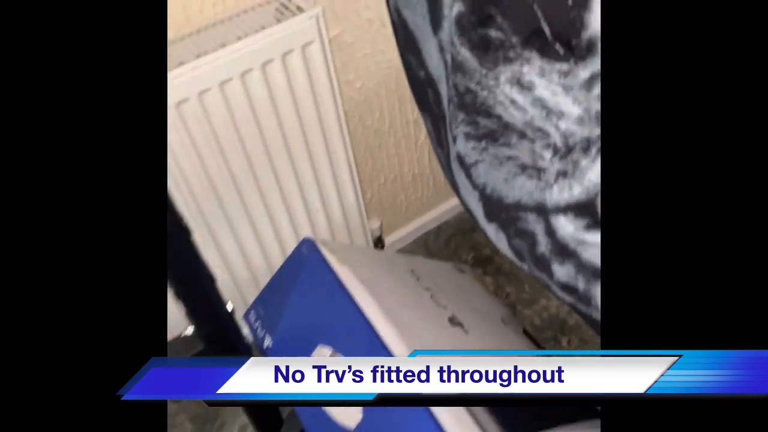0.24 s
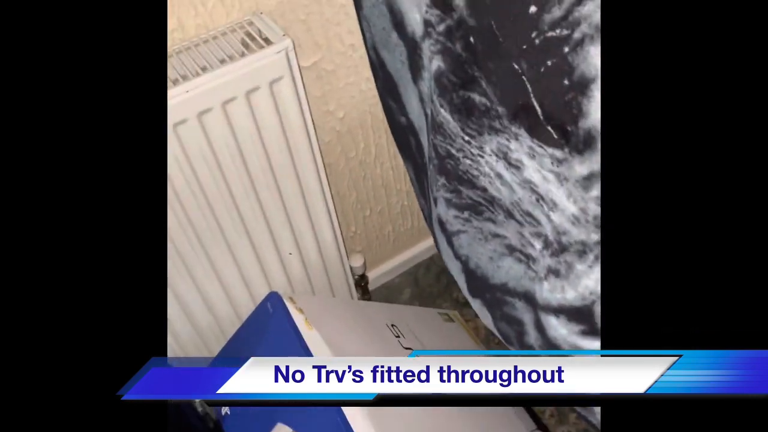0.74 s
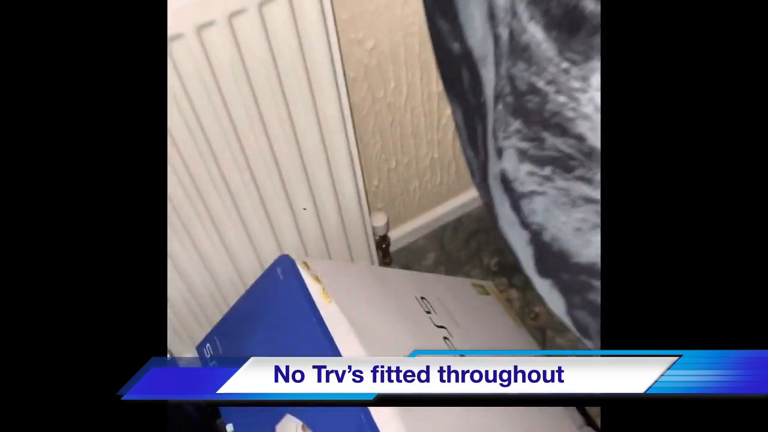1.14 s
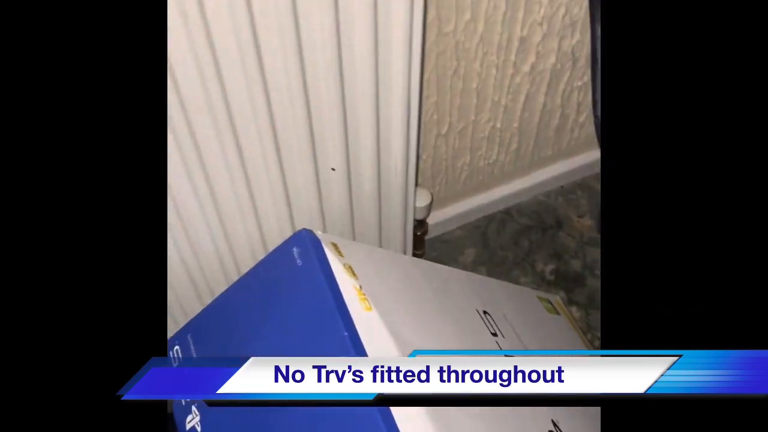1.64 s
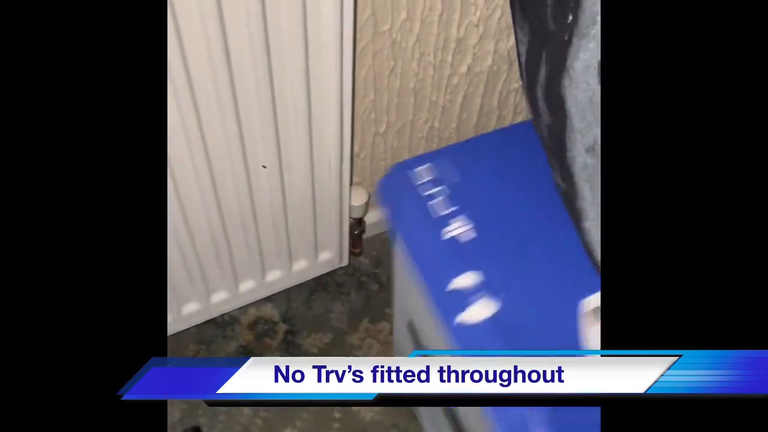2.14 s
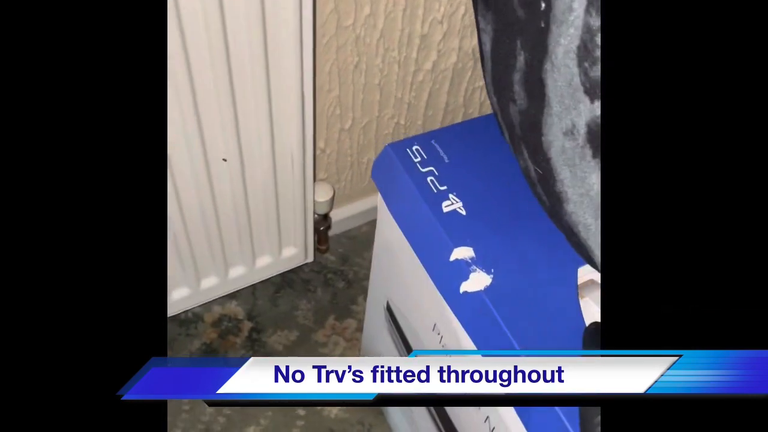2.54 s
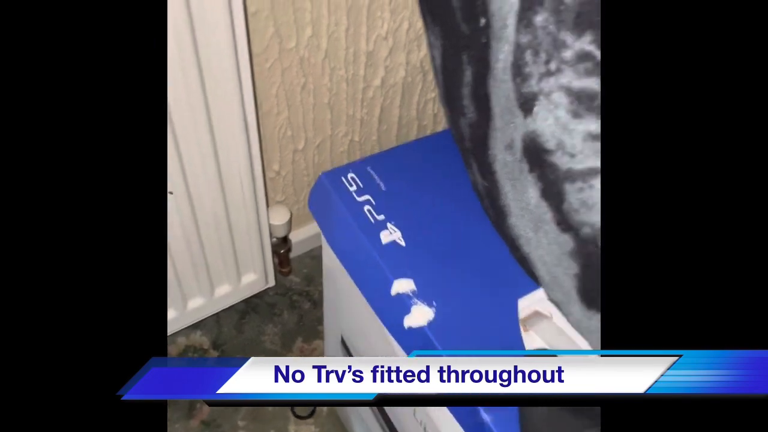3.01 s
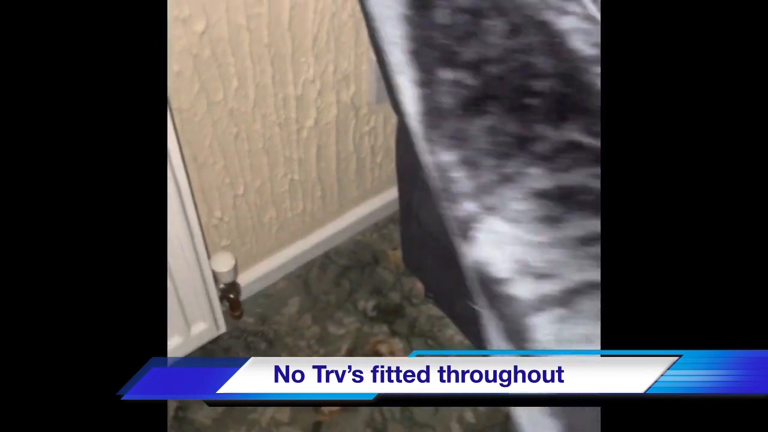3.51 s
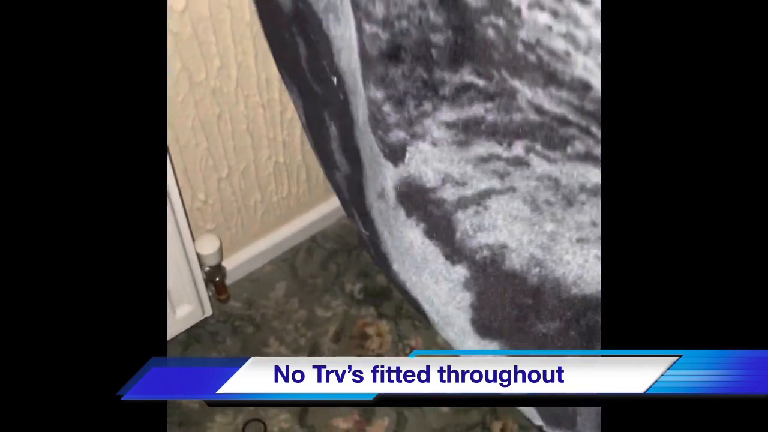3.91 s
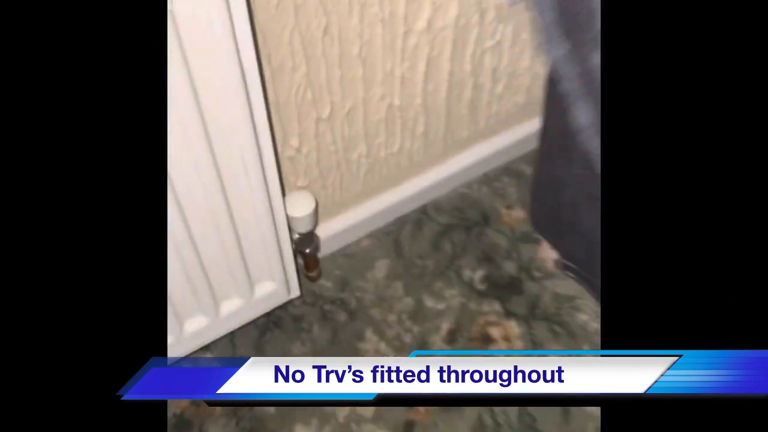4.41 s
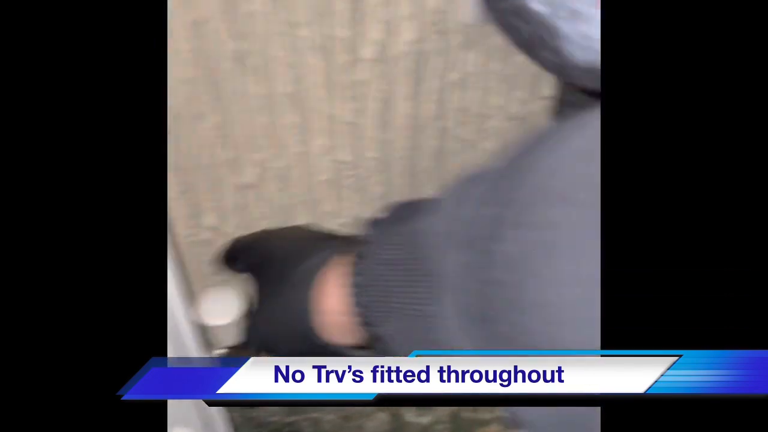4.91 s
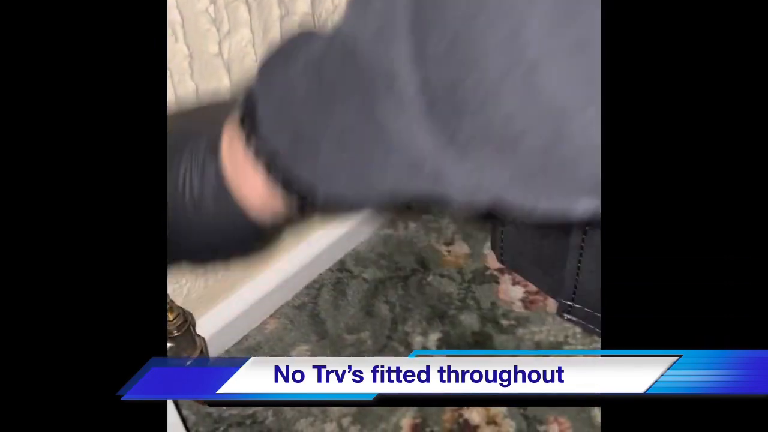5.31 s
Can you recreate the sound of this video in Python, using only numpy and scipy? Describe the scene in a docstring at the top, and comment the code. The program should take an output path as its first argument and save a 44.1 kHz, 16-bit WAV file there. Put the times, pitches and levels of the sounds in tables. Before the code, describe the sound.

In a small furnished room, someone moves a cardboard box across a carpeted floor. Feet, knees and the hollow box thud unevenly on the boards, while flaps tick, soles scuff and clothes rustle. After a quieter moment, a stiff joint creaks briefly and a hard knock makes a metal radiator panel ring and rattle. A phone picks it up close by, over a faint low house rumble.

```python
"""Knees, feet and a cardboard box thud on carpeted floorboards as someone kneels and shifts the box.
Flaps tick, soles scuff, and clothes and card rustle over the carpet. At the end a stiff joint creaks
as it sticks and slips, and a hard knock sets the metal panel of a radiator ringing. The house rumbles
faintly throughout. The small furnished room is heard by a phone with two microphone openings."""
import sys
import numpy as np
from scipy import signal
from scipy.fft import rfft, irfft, next_fast_len
from scipy.io import wavfile
from scipy.ndimage import uniform_filter1d

SR = 44100
rng = np.random.default_rng(int(sys.argv[2]) if len(sys.argv) > 2 else 0)


def materialize(psi):
    """Save the field psi as 16-bit PCM at rate SR to the path in sys.argv[1].

    A 1-D psi becomes a single channel; in a 2-D psi each row is a channel.
    """
    bounded = np.clip(np.atleast_2d(psi).T, -1, 1)
    quanta = np.round(bounded * 32767).astype(np.int16)
    wavfile.write(sys.argv[1], SR, quanta)


N = 244734
RING_SAMPLES = int(0.65 * SR)


def undb(db):
    """Turn decibels into a number to multiply by."""
    return 10 ** (np.asarray(db) / 20)


def along(table, n):
    """Read a table of (pitch_hz, value) at every frequency of an n-sample spectrum."""
    hz, value = np.transpose(table)
    return np.interp(np.log(np.arange(n // 2 + 1) * SR / n + 1), np.log(hz), value)


def noise(colour, grain_db=0.):
    """Noise of average strength 1, shaped by (pitch_hz, level_db) rows; grain_db makes it crackle."""
    ends = [(colour[0][0] / 2, -80)] + list(colour) + [(colour[-1][0] * 2, -80)]
    n = next_fast_len(N)
    grains = rng.standard_normal(n) * undb(grain_db * np.minimum(rng.exponential(size=n), 7))
    x = irfft(rfft(grains) * undb(along(ends, n)), n)[:N]
    return x / x.std()


def wander(rate_hz):
    """A curve that glides to a new random value rate_hz times a second."""
    step = int(SR / rate_hz) + 1
    return uniform_filter1d(np.repeat(rng.standard_normal(N // step + 1), step), step)[:N]


def fade(fade_s, count=RING_SAMPLES):
    """A level that falls by 60 dB every fade_s seconds."""
    return np.exp(-np.log(1000) * np.arange(count) / SR / fade_s)


def swell(rise_s, count=RING_SAMPLES):
    """A level that builds smoothly from 0 to 1, like the force of a contact."""
    return 1 - np.exp(-(np.arange(count) / SR / rise_s) ** 2)


def ring(hz, fade_s, phase=0., count=RING_SAMPLES):
    """One pure tone dying away."""
    return np.sin(2 * np.pi * hz * np.arange(count) / SR + phase) * fade(fade_s, count)


def band(x, hz, width_hz):
    """A resonance: keep the part of a sound that lies near hz."""
    width_hz = np.clip(width_hz, 10, min(3 * hz, SR / 3))
    return signal.lfilter(*signal.iirpeak(hz, hz / width_hz, SR), x)


def add(track, start_s, sound):
    """Mix a sound into the track at start_s."""
    i = int(start_s * SR)
    track[i:i + len(sound)] += sound[:N - i]


def house_rumble():
    """The house gives off a faint, steady, deep noise."""
    return undb(-59) * noise([(36, -24), (44, 11.5), (52, -10), (62, 9.5), (80, 2)])


def room_echo(sound):
    """The furnished room returns two short, dull echoes, each a different blur of the sound."""
    t = np.arange(int(0.5 * SR)) / SR
    tails = rng.standard_normal((2, len(t))) * fade(0.19, len(t)) * np.minimum(t / 0.00069, 1)
    tails = signal.lfilter(*signal.butter(1, [215, 3300], "band", fs=SR), tails)
    tails /= np.sqrt((tails[0] ** 2).sum())
    return undb(-15.5) * signal.fftconvolve(sound[None], tails, axes=1)[:, :N]


def patchy(x, depth_db=1.3, width_hz=1244):
    """Each range of pitch swells and sinks on its own, about 40 ms at a time."""
    hz, _, spectrum = signal.stft(x, SR, nperseg=512)
    patches = rng.standard_normal(spectrum.shape[1:])
    for _ in range(2):
        patches = uniform_filter1d(patches, int(width_hz / hz[1]), axis=0)  # smooth across pitch
        patches = uniform_filter1d(patches, 7, axis=1)  # smooth across time
    return signal.istft(spectrum * undb(depth_db * patches / patches.std()), SR, nperseg=512)[1][:, :N]


def movement():
    """With each move, cloth rustles, card drags and weight makes the boards rumble; two noise tracks."""
    # moves over the carpet: start_s, hold_s, cloth_db, card_db, boards_db
    moves = [(0, 0.13, -62, -56, -59.5), (0.231, 0.32, -61.5, -69, -58.5), (0.82, 0.14, -61.5, -56.5, -53),
             (1.253, 0.12, -58.5, -53, -43.5), (1.673, 0.0074, -56, -60, -41),
             (1.693, 0.0057, -62, -46.5, -33.5), (2.06, 0.018, -57.5, -74, -49),
             (2.162, 0.054, -51, -48, -38.5), (2.389, 0.056, -53, -61, -48),
             (2.51, 0.03, -63, -49.5, -44.5), (2.725, 0.033, -60, -55, -42),
             (2.907, 0.037, -54.5, -43.5, -46), (2.972, 0.067, -61, -69, -41),
             (3.291, 0.011, -54, -52.5, -46.5), (3.534, 0.14, -50.5, -51.5, -41),
             (3.692, 0.16, -69, -52, -43.5), (3.849, 0.14, -63, -57.5, -48.5),
             (4.099, 0.042, -52, -60, -59), (4.211, 0.14, -56.5, -54, -50.5),
             (4.37, 0.6, -58.5, -65, -56.5), (5.134, 0.11, -65, -49.5, -55),
             (5.25, 0.015, -73, -44.5, -32.5), (5.347, 0.09, -88, -48, -40)]
    # tone colour of rustling cloth: pitch_hz, level_db
    cloth = [(700, 0.5), (1000, 4), (1850, 1), (2600, 2), (4100, -1), (6000, -1.5), (8000, -7), (11000, -7),
             (13000, -13), (16000, -11.5)]
    # tone colour of dragged card: pitch_hz, level_db
    card = [(200, 9.5), (300, 8), (500, 5.5), (900, -2), (1500, -9.5), (2500, -13)]
    # tone colour of boards under weight: pitch_hz, level_db
    boards = [(30, -25), (40, 5.5), (51, 7), (65, 3.5), (108, 4), (160, -2.5), (220, -4.5), (300, -17),
              (420, -19)]
    # colour, rest_db, rise_db_per_s, fall_db_per_s, flicker_db, flicker_hz, grain_db
    layers = [(cloth, -68, 298, 153, 1.8, 70, 2.8),
              (card, -63.5, 249, 145, 3.5, 50, 2.2),
              (boards, -62.5, 230, 101, 3.5, 15, 0)]
    t = np.arange(N) / SR
    start_s, hold_s, *levels_db = np.transpose(moves)[:, :, None]
    before_s, after_s = np.maximum(start_s - t, 0), np.maximum(t - start_s - hold_s, 0)
    out = 0
    for (colour, rest_db, rise, fall, flicker_db, flicker_hz, grain_db), db in zip(layers, levels_db):
        move_gains = undb(db - rise * before_s - fall * after_s)
        power = undb(rest_db) ** 2 + (move_gains ** 2).sum(axis=0)
        gain = np.sqrt(power) * undb(flicker_db * wander(flicker_hz))
        pair = np.array([noise(colour, grain_db), noise(colour, grain_db)])
        out = out + gain * (patchy(pair) if colour is cloth else pair)
    return out


def scuffs():
    """A sole or card rubs the carpet: a short hiss swells and fades."""
    # rubs on the carpet: start_s, peak_db, pitch_hz, width_hz, fade_s
    rubs = [(0.284, -46.5, 1930, 500, 0.067), (.865, -44, 1930, 600, 0.18),
            (1.722, -40.5, 2170, 2920, 0.16), (2.016, -39, 1880, 2500, 0.1),
            (2.882, -36, 1620, 1460, 0.036), (3.532, -36.5, 3000, 4000, 0.09)]
    out = np.zeros(N)
    for start_s, peak_db, hz, width_hz, fade_s in rubs:
        friction = rng.standard_normal(RING_SAMPLES) * fade(fade_s) * swell(rise_s=0.016)
        rub = band(band(friction, hz, width_hz), hz, 2 * width_hz)
        add(out, start_s, undb(peak_db) * rub / abs(rub).max())
    return out


def creak(throb_hz=45, throb_db=1):
    """A stiff joint sticks and slips hundreds of times a second, and each slip shakes the wood."""
    # course of the creak: time_s, slip_rate_hz, level_db
    course = [(5.1, 500, -57), (5.12, 518.2, -41.5), (5.155, 546.3, -32.5), (5.192, 571.3, -30.5),
              (5.199, 577, -25.5), (5.227, 438.3, -27.5), (5.25, 426.5, -24.5), (5.272, 430, -30)]
    # resonances of the wood: pitch_hz, width_hz, level_db
    wood = [(429, 37, 1.5), (554, 74, 0.5), (836, 98, -12), (1114, 114, -15), (1400, 100, -19.5),
            (1620, 120, -26), (2370, 130, -38)]
    t = np.arange(N) / SR
    time_s, slip_hz, level_db = np.transpose(course)
    slip_count = np.cumsum(np.interp(t, time_s, slip_hz) * (1 + 0.02036 * wander(120))) / SR
    slips = np.diff(np.floor(slip_count), prepend=0) * undb(1.9 * wander(90))
    slips += 0.092 * rng.standard_normal(N)
    body = sum((-1) ** k * undb(db) * band(slips, hz, width) for k, (hz, width, db) in enumerate(wood))
    grip_db = throb_db * np.cos(2 * np.pi * throb_hz * (t - time_s[4]))  # grips and lets go
    return body / body.std() * undb(np.interp(t, time_s, level_db, left=-120, right=-120) + grip_db)


def radiator(detune=0.0252):
    """Knocks ring the metal panel's tones nearest their own pitch; hard knocks make the tones rattle."""
    # tones of the panel: pitch_hz, level_db, fade_s
    panel = [(405.5, -7, 0.36), (722.5, -32, 0.53), (1087, -23, 0.53), (1040, -23.5, 0.76),
             (1208, -11, 0.029), (1374, -10, 0.062), (1604, -10.5, 0.038), (1500, -20, 0.33),
             (2690, -26, 0.52), (5760, 3.5, 0.054)]
    # blows that reach the panel: start_s, level_db, pitch_hz, spread_octaves, rattle (0 to 1)
    knocks = [(4.242, -13.5, 726, .12, 0), (5.2631, -6.5, 1360, 1.125, 0.76), (5.283, -12, 890, 0.92, 0.84)]
    out = np.zeros(N)
    for k, (hz, tone_db, fade_s) in enumerate(panel):
        shake = 1.07 * wander(130)
        neighbours = np.array([0, *rng.uniform(-1.02, 1, size=2)])  # each tone is three close ones
        for start_s, knock_db, knock_hz, spread_octaves, rattle in knocks:
            nearness = np.exp(-(np.log2(hz / knock_hz) / spread_octaves) ** 2)
            gain = (-1) ** k * undb(knock_db + tone_db) * nearness / 2
            tone = sum(ring(hz * (1 + detune * n), fade_s, 2 * np.pi * n) for n in rattle * neighbours)
            depth = rattle * swell(rise_s=0.022)
            flutter = 1 - depth + depth * np.roll(shake, -int(start_s * SR))[:RING_SAMPLES]
            add(out, start_s, gain * tone * flutter)
    return out


def crack(time_s=5.264, level_db=-4, pitch_hz=1320, width_s=0.00075):
    """The hard knock first meets the radiator in one very short, sharp pulse."""
    t = np.arange(N) / SR - time_s
    return undb(level_db) * np.exp(-(t / width_s) ** 2) * np.sin(1 - 2 * np.pi * pitch_hz * t)


def ticks(count=14000):
    """Card, shoe and metal touch: each makes a pitched burst of noise with a shorter, broader edge. The long
    row at 5.27 s is not a touch: it is a diffuse noise tail that lingers after the hard knock."""
    # contacts, plus one lingering tail at 5.27 s: start_s, level_db, pitch_hz, fade_s, edge_db
    contacts = [(.016, -26.5, 1900, 0.17, -4.5), (.019, -29.5, 3600, 0.19, -1.5),
                (0.441, -44, 590, 0.53, -28), (0.807, -40, 2480, 0.031, -31),
                (1.641, -27.5, 1330, 0.021, -6), (1.656, -35, 4200, 0.027, -4),
                (1.671, -19.5, 965, 0.06, -13), (1.668, -22.5, 3610, 0.029, 2),
                (1.914, -41, 1190, 0.025, -20), (2.045, -31, 1510, 0.028, 1), (2.137, -37, 1800, 0.066, -2),
                (2.182, -31, 1500, 0.3, -17), (2.243, -27.5, 1150, 0.02, -12),
                (2.308, -35.5, 1190, 0.041, -3.5), (2.408, -33.5, 2570, 0.064, -2),
                (2.434, -35, 4950, 0.028, -5.5), (2.706, -32, 890, 0.057, -12),
                (2.735, -25, 1470, 0.045, -7.5), (2.769, -35.5, 1040, 0.027, -8),
                (2.914, -25.5, 775, 0.11, -33), (2.927, -22.5, 1680, 0.043, -8.5),
                (3.101, -55.5, 6030, 0.017, 15.5), (3.214, -40, 1100, 0.03, -9),
                (3.253, -37.5, 897, 0.024, -27), (3.634, -33, 2900, 0.048, -17),
                (3.671, -37.5, 3040, 0.048, -31), (3.852, -39.5, 2520, 0.043, -12),
                (4.184, -29, 1130, 0.13, 2), (4.236, -31, 2050, 0.011, -26), (4.433, -44.5, 885, 0.024, 2),
                (4.452, -46, 3700, 0.016, -13), (4.55, -49, 2500, .015, 2), (4.93, -45.5, 4970, 0.014, -7),
                (4.982, -48, 5900, .012, -4), (5.27, -26.5, 1405, 0.33, -17),
                (5.263, -23, 10010, 0.0062, 5.5), (5.266, -24, 2550, 0.069, -4),
                (5.293, -17.5, 1240, 0.022, -8.5)]
    out = np.zeros(N)
    for start_s, level_db, hz, fade_s, edge_db in contacts:
        body_noise, edge_noise = rng.standard_normal((2, count))
        rise_s = 0.0015 if edge_db >= 0 else 0.0003
        shape = fade(fade_s, count) * swell(rise_s, count)
        ping = 0.35 * ring(hz, fade_s=0.024, count=count)
        body = band(band((body_noise + ping) * shape, hz, 0.4 * hz), hz, 1.75 * hz)
        edge = band(edge_noise * shape ** 2.2, hz=680, width_hz=2040)
        tick = body / abs(body).max() + undb(edge_db) * edge / abs(edge).max()
        add(out, start_s, undb(level_db) * tick)
    return out


def thuds():
    """The carpet softens each blow, which rings the thing that lands, the hollow box and the boards."""
    # blows of knees, feet and box: start_s, level_db, pitch_hz, fade_s, hollow_db
    blows = [(0.017, -23.5, 375.6, 0.23, 1), (1.21, -40.5, 232, 0.13, -23), (1.277, -33, 70, 0.1, -24),
             (1.642, -28.5, 168, 0.22, -7), (1.669, -14, 208, 0.15, -7), (1.896, -34, 110, 0.066, -11),
             (2.047, -25, 282, 0.054, -13), (2.055, -23.5, 121, 0.14, -32), (2.196, -17.5, 70.5, 0.078, -7),
             (2.226, -20, 133, 0.12, -5), (2.311, -20.5, 398, 0.03, -20), (2.325, -29.5, 134, 0.14, -29),
             (2.423, -33.5, 107, 0.08, -12), (2.709, -29, 134, 0.031, -3.5),
             (2.733, -21, 136.3, 0.25, -1.5), (2.917, -28.5, 304, 0.09, 5), (2.933, -14.5, 146, 0.057, -16),
             (3.009, -30, 318, 0.074, -6), (3.392, -39, 71.6, 0.041, -0.5),
             (3.556, -23.5, 110, 0.044, -5.5), (3.565, -23, 306, 0.092, -38), (3.764, -32, 177, 0.12, -18),
             (3.854, -31, 200, 0.11, -15), (3.931, -30.5, 95, 0.058, -5.5), (4.185, -30, 293, 0.065, 0),
             (4.224, -25.5, 117, 0.066, -15), (4.467, -34, 63.5, 0.11, -37),
             (4.672, -24.5, 67.8, 0.32, -19), (5.111, -34, 89, 0.2, -23), (5.271, -13.5, 86, 0.077, -7),
             (5.301, -27, 49.6, 1, -26), (5.308, -23.5, 107.5, 0.24, -27)]
    # tones of the floorboards: pitch_hz, level_db, fade_s
    board_tones = [(50.5, -0.5, 0.15), (106, -5.5, 0.16), (162.7, -2.5, 0.2), (210.5, -5.5, 0.2)]
    out = np.zeros(N)
    variations = rng.standard_normal((len(blows), len(board_tones)))
    for (start_s, level_db, hz, fade_s, hollow_db), variation in zip(blows, variations):
        body = ring(hz, fade_s) + undb(-14) * ring(1.108 * hz, fade_s)
        body += undb(-13) * ring(1.9 * hz, 0.86 * fade_s)
        boards = sum(undb(db + 8.3 * chance) * ring(board_hz * (1 + 0.045 * chance), board_fade_s)
                     for (board_hz, db, board_fade_s), chance in zip(board_tones, variation))
        boards_db = -12.5 - 1.5 * np.log2(hz / 130)  # higher, lighter things shake the boards less
        burst = rng.standard_normal(RING_SAMPLES) * fade(0.13)
        hollow = band(band(burst, hz=313, width_hz=284), hz=415, width_hz=560)
        blow = body + undb(boards_db) * boards + undb(hollow_db) * hollow / abs(hollow).max()
        add(out, start_s, undb(level_db) * blow * swell(rise_s=0.0039))
    return out


def scene():
    """Direct sound sits in the middle; echo and movement noise also differ between left and right."""
    # how much of that left-right difference is kept: pitch_hz, level_db
    spread = [(60, -45), (150, -25), (300, -13), (700, -4.5), (1500, -4.5), (4000, 2.5), (6500, -38),
              (16000, -62)]
    direct = thuds() + ticks() + scuffs() + creak() + radiator() + crack() + house_rumble()
    middle, side = room_echo(direct) + movement()
    n = next_fast_len(N)
    side = irfft(rfft(side, n) * undb(along(spread, n)), n)[:N]
    return np.array([direct + middle + side, direct + middle - side])


def record(dry, bass_cut_hz=38, treble_cut_hz=16000):
    """The phone's two openings differ in timing and level; the deepest bass and top treble are cut."""
    # how far the left opening's wave runs ahead of the right: pitch_hz, lead_radians
    left_lead = [(100, 0), (3000, 0), (5300, .2), (7600, 3.14), (11200, 6.28), (14200, 9.42), (16500, 11)]
    # how much louder the left opening is than the right: pitch_hz, level_db
    balance = [(100, 0.5), (300, .5), (700, 3), (1500, 2), (3000, 0), (16000, -1)]
    n = next_fast_len(N + 2048)
    half_difference = undb(along(balance, n) / 2) * np.exp(0.5j * along(left_lead, n))
    stereo = irfft(rfft(dry, n) * np.array([half_difference, 1 / half_difference]), n)[:, :N]
    stereo = signal.sosfilt(signal.butter(4, bass_cut_hz, "high", fs=SR, output="sos"), stereo)
    return signal.sosfilt(signal.ellip(10, 0.2, 80, treble_cut_hz, fs=SR, output="sos"), stereo)


dry = scene()
out = record(dry)
materialize(out)
```